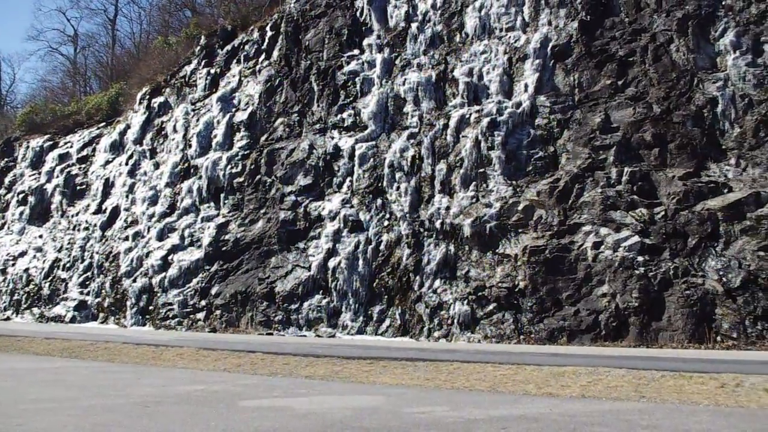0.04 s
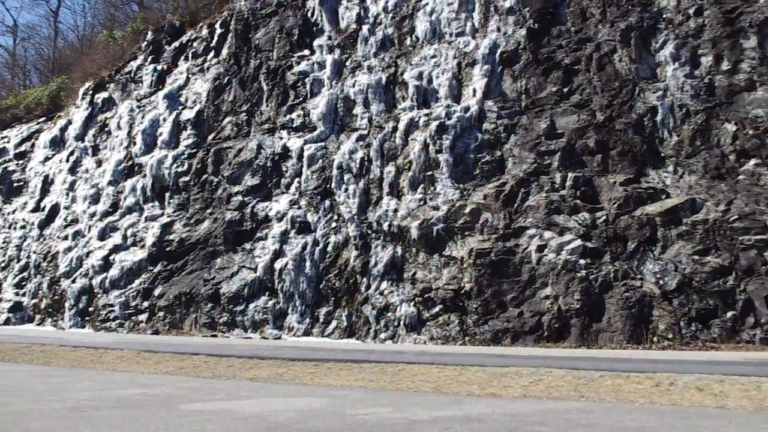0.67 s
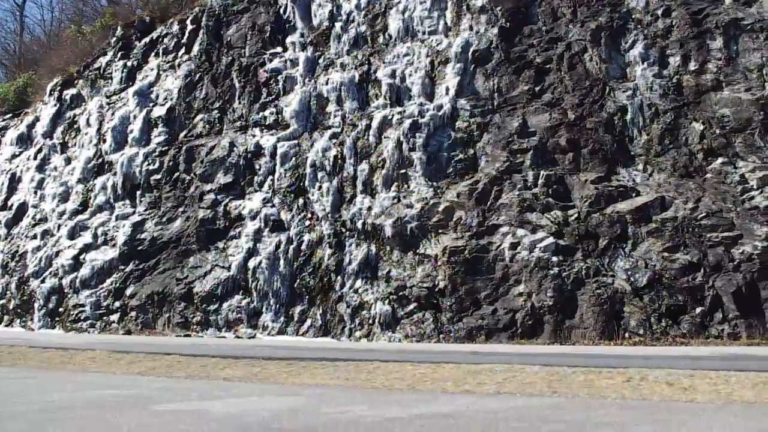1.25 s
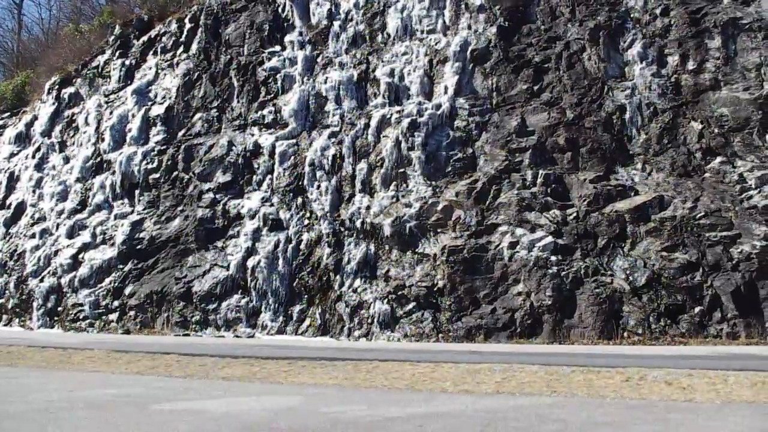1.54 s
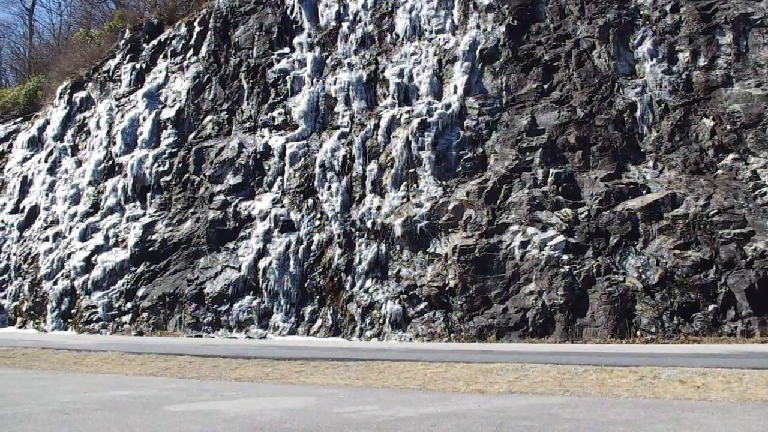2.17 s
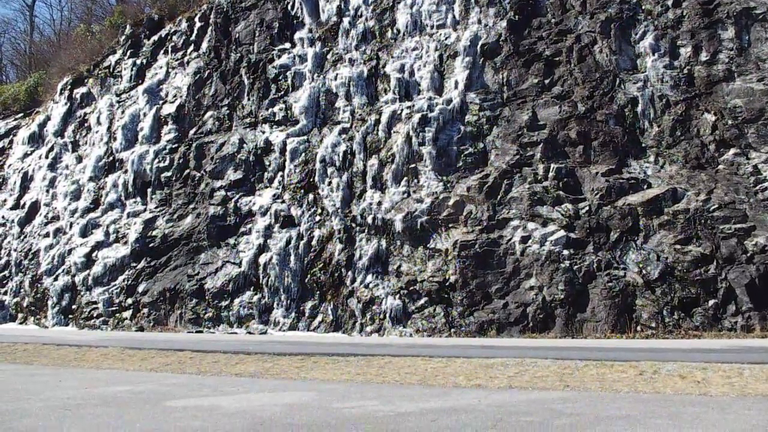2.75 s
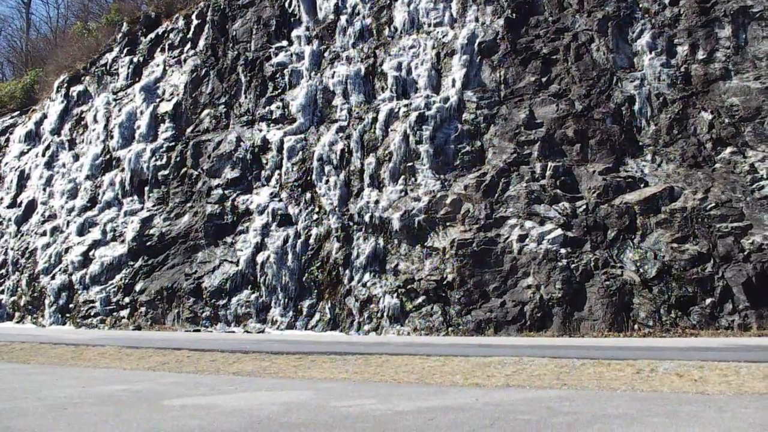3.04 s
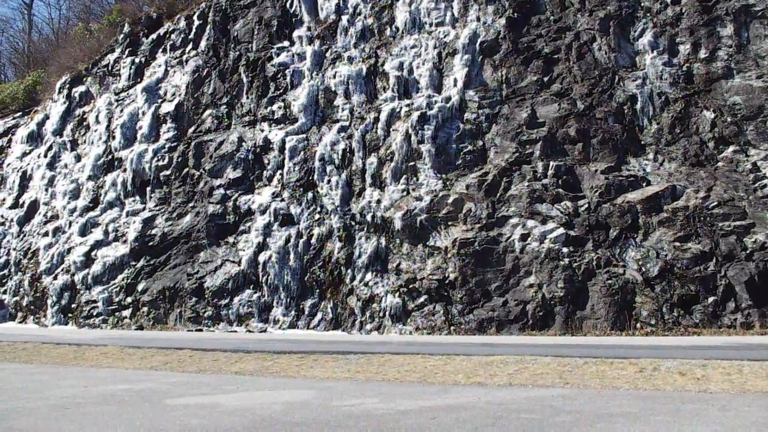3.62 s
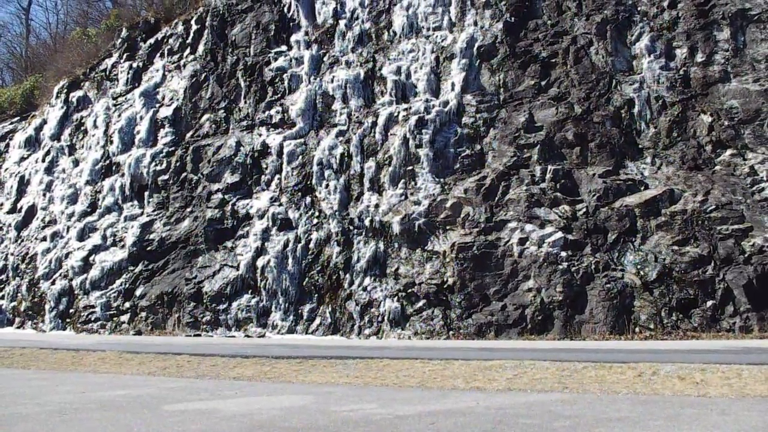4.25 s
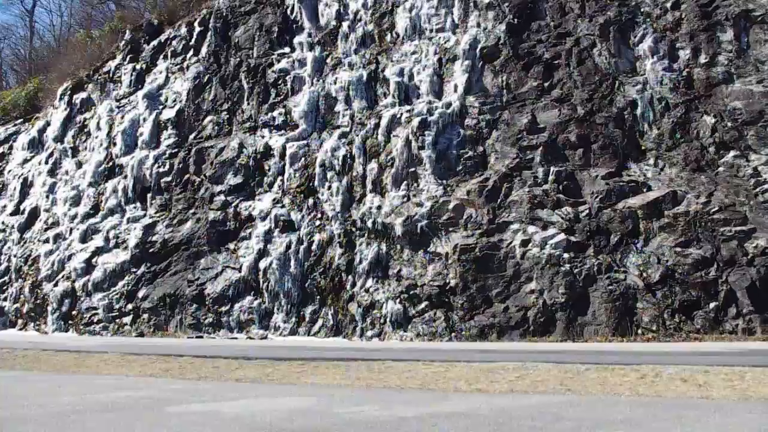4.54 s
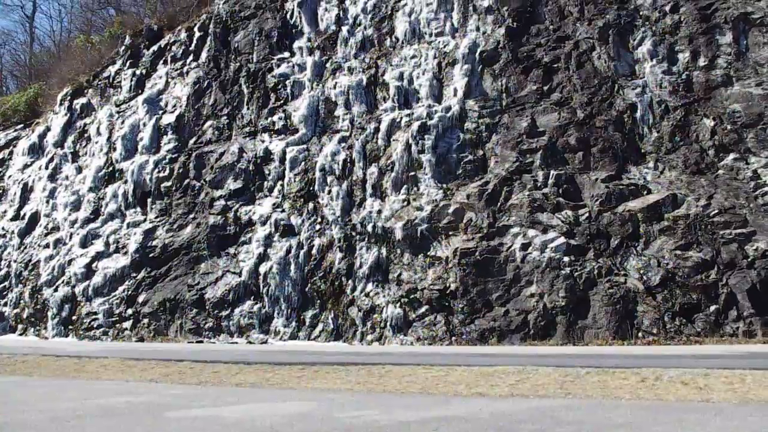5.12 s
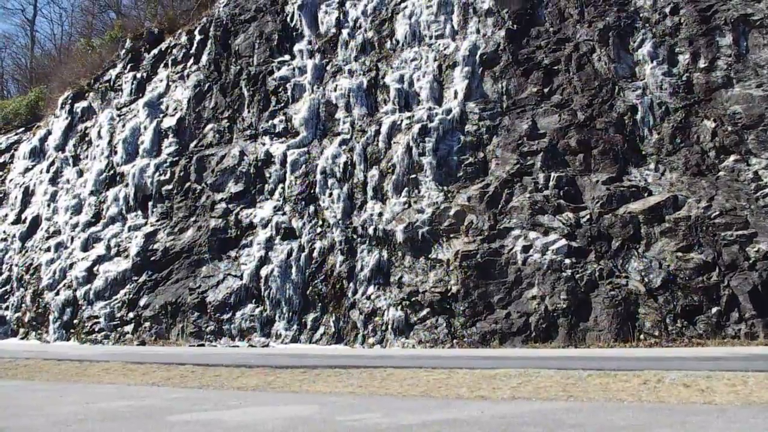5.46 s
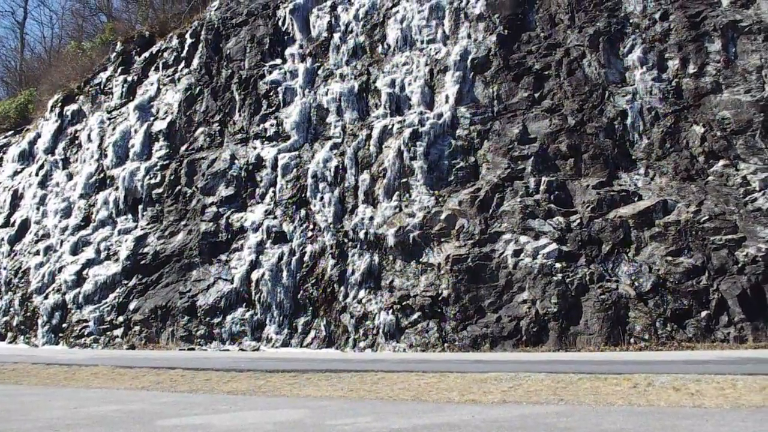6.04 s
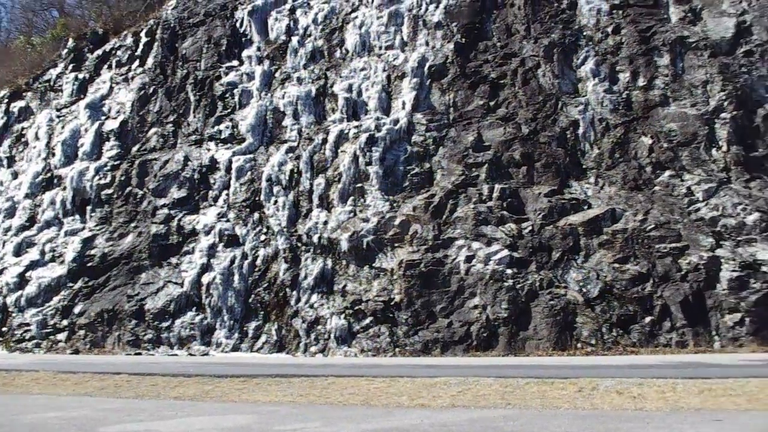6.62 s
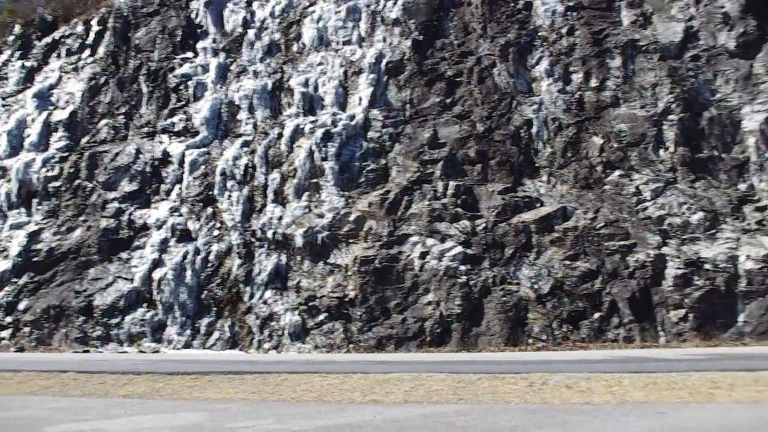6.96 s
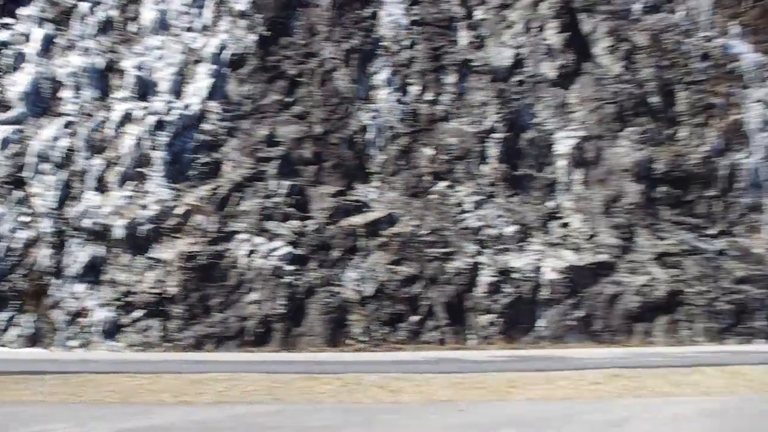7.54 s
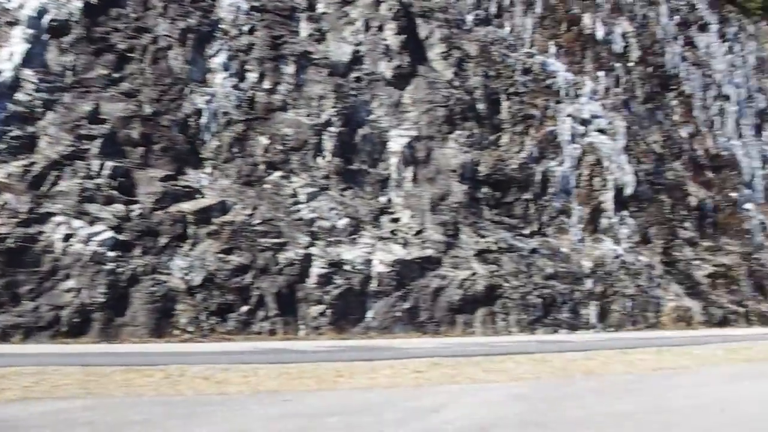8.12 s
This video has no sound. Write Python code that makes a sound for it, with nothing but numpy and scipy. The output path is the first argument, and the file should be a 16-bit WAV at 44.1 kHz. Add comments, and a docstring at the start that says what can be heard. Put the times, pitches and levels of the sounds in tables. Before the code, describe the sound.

Outdoors by an icy cliff, meltwater and crumbling ice fall in uneven flurries of sharp clicks, tiny splashes and brief crunches, over the steady hiss of trickling water. After a quieter middle stretch with scattered drips, a few hollow knocks lead into a denser, crackling shower. Low gusts of wind buffet the microphone, strongest near the end.

```python
"""Sharp ticks, splashes and crumbling ice patter down in showers, with a lull between them.
Meltwater and ice fall down a thawing roadside rock face: each piece shatters or splashes in a burst of
tiny cracks, heaps of crumbs slide, and heavy pieces knock on hollow sheets of ice. Behind them, fine
spray ticks over the hiss of trickling water and faint open air. Light wind rumbles and now and then
buffets the microphone."""
import sys
import numpy as np
from scipy import signal
from scipy.fft import rfft, irfft
from scipy.io import wavfile
from scipy.ndimage import uniform_filter1d

SR = 44100
rng = np.random.default_rng(int(sys.argv[2]) if len(sys.argv) > 2 else 0)


def store_wav(level_fs):
    """Save 16-bit WAV to argv[1]."""
    pcm = np.round(np.clip(np.atleast_2d(level_fs), -1, 1) * 32767)
    wavfile.write(sys.argv[1], SR, pcm.T.astype(np.int16))


N = 365588


def undb(db):
    """Decibels to gain."""
    return 10 ** (np.asarray(db) / 20)


def unit(x):
    """Scale to rms 1."""
    return x / np.sqrt(np.mean(x ** 2) + 1e-18)


def curve(table, column):
    """One column of a timed table, at every sample."""
    rows = np.array(table)
    return np.interp(np.arange(N) / SR, rows[:, 0], rows[:, column])


def bell(t, s, width):
    """A smooth swell of height 1 around time s."""
    return np.exp(-.5 * ((t - s) / width) ** 2)


def waver(rate_hz):
    """A random drift of rms 1: held steps, smoothed twice."""
    hold = int(SR / rate_hz)
    steps = np.repeat(rng.standard_normal(N // hold + 1), hold)
    return unit(uniform_filter1d(uniform_filter1d(steps, hold), hold)[:N])


def ring(x, gain_db, size=512):
    """Pass x through the causal filter whose dB gain is given as a function of frequency."""
    hz = np.maximum(np.arange(size // 2 + 1), .5) * SR / size
    cepstrum = irfft(np.log(undb(gain_db(hz))))[:size // 2]
    cepstrum[1:] *= 2  # minimum phase: nothing sounds ahead of the attack
    impulse = irfft(np.exp(rfft(cepstrum, size)))
    return signal.fftconvolve(x, impulse)[:len(x)]


def colour(x, points):
    """Equalise x along (Hz, dB) points."""
    hz, db = np.transpose(points)
    return ring(x, lambda f: np.interp(np.log(f), np.log(hz), db), size=4096)


def add(out, s, sound):
    """Mix a sound in at time s."""
    start = int(np.clip(s * SR, 0, N - 1))
    out[start:start + len(sound)] += sound[:N - start]


def grains(per_s, spread_db, decay_s, shared):
    """A broadband crackle of rms 1: each tiny grain sounds in its own band, and some span all bands."""
    def sparks():
        """Power of random grains that start at once and die away; mean 1."""
        draw = rng.random(N) * SR / per_s
        born, energy = draw < 1, np.zeros(N)
        size = np.minimum(-np.log(draw[born]), 5)  # most small, a few large
        energy[born] = undb(spread_db * size) ** 2
        power = signal.lfilter([1], [1, -np.exp(-1 / (decay_s * SR))], energy + 1e-9)
        return power / power.mean()
    common, out = sparks(), 0
    edges_hz = [150, 1000, 2000, 3500, 5500, 8000, 18000]
    for band in zip(edges_hz, edges_hz[1:]):
        burst = rng.standard_normal(N) * np.sqrt(shared * common + (1 - shared) * sparks())
        out = out + signal.sosfilt(signal.butter(2, band, "bandpass", fs=SR, output="sos"), burst)
    return unit(out)


def open_air(level_db=-45):
    """A faint, low bed of outdoor noise that barely moves."""
    # tone of the air: (frequency [Hz], gain [dB])
    spectrum = [(25, -23), (70, -24.5), (115, -14), (165, -2.5), (240, -0.5), (330, -1), (500, -3),
                (900, -7.5), (1500, -12), (4000, -26.5), (15000, -40)]
    return unit(colour(rng.standard_normal(N), spectrum)) * undb(level_db + .5 * waver(5.1))


def wind(calm_db=-68.5, breeze_db=-58, freshen_s=4.4):
    """A wavering rumble: gusts swell and fade over a light breeze that slowly freshens."""
    # gusts: (peak time [s], level [dB], half width [s])
    gusts = [(.21, -55, 0.043), (2.15, -47.5, 0.093), (3.11, -54, 0.042), (3.936, -54, .06),
             (4.427, -41.5, 0.089), (5.443, -45, 0.034), (5.705, -44, 0.072), (5.98, -43, 0.073),
             (6.197, -44, 0.05), (6.498, -44, 0.1), (6.683, -44.5, 0.089), (6.864, -41.5, 0.084),
             (7.414, -39, 0.064), (7.563, -33.5, 0.056), (7.923, -42, 0.12)]
    # tone of the rumble: (frequency [Hz], gain [dB])
    spectrum = [(20, -83), (40, -11), (70, -1.5), (130, 3.5), (220, 0), (400, -9), (800, -30), (3000, -36)]
    t = np.arange(N) / SR
    breeze = undb(calm_db + (breeze_db - calm_db) * np.minimum(t / freshen_s, 1) ** 2)
    gust_power = sum((undb(db) * bell(t, s, width)) ** 2 for s, db, width in gusts)
    rumble = unit(colour(rng.standard_normal(N), spectrum))
    return rumble * np.sqrt(breeze ** 2 + gust_power) * undb(3.2 * waver(35))


def buffets(usual_width_s=0.0041, lead_s=.1):
    """Single eddies bump the microphone; briefer ones sound higher."""
    # eddies: (peak time [s], level [dB], half width [s])
    eddies = [(0.211, -34.5, 0.0088), (3.998, -21, 0.00066), (4.005, -18, 0.0016), (4.456, -32.5, 0.0063),
              (4.517, -31.5, 0.0024), (5.475, -39, 0.0044), (5.625, -40, .007), (5.792, -30.5, 0.0061),
              (5.85, -30, 0.005), (5.962, -30.5, 0.0065), (6.208, -31, 0.0071), (6.259, -31.5, 0.0076),
              (6.443, -35, 0.0049), (6.469, -24.5, 0.0043), (6.483, -24.5, 0.0079), (6.533, -31.5, .003),
              (6.596, -23.5, 0.0032), (6.637, -38, 0.0035), (6.716, -37, 0.009), (6.865, -27.5, 0.0016),
              (6.903, -35.5, 0.0047), (7.212, -26, 0.0018), (7.22, -25.5, 0.0043), (7.505, -16, 0.0011),
              (7.527, -30, 0.0023), (7.54, -24, 0.0065), (7.568, -24, 0.0027), (7.578, -23.5, 0.0028),
              (7.6, -22, 0.0014), (7.612, -26.5, 0.0098), (7.627, -14, 0.00082), (7.641, -31, 0.0047),
              (7.9, -35.5, 0.0051), (7.956, -27.5, 0.0056), (8.028, -40, .007)]
    # tone of an eddy of the usual width: (frequency [Hz], gain [dB])
    spectrum = [(20, -40), (40, -18), (70, -10), (130, 2.5), (190, 5.5), (300, -0.5), (420, -7),
                (700, -21.5), (2000, -32)]
    out, t = np.zeros(N), np.arange(int(2 * lead_s * SR)) / SR
    for s, db, width in eddies:
        swell = bell(t, lead_s, width)
        pitch = (usual_width_s / width) ** 0.14
        swirl = colour(rng.standard_normal(len(t)) * swell, [(hz * pitch, g) for hz, g in spectrum])
        add(out, s - lead_s, unit(swirl) * np.sqrt(np.mean(swell ** 2)) * undb(db))
    return out


def trickle(centre_hz=5800, width_hz=5700, level_db=-50.5):
    """Thin streams hiss steadily further along the face."""
    noise = rng.standard_normal(N)
    hiss = ring(noise, lambda f: -10 * np.log10(1 + ((f - centre_hz ** 2 / f) / width_hz) ** 2))
    return unit(hiss) * undb(level_db + waver(44))


def patter(spray_db, drops_db):
    """Fine spray and heavier drops tick on rock and ice, in uneven flurries."""
    # bright tone of the spray: (frequency [Hz], gain [dB])
    spray_tone = [(1500, -18.5), (2800, -16.5), (4000, -5), (5800, -4), (7500, -1.5), (10000, -2),
                  (15000, 5.5)]
    # midrange tone of the drops: (frequency [Hz], gain [dB])
    drop_tone = [(400, -29), (800, -1), (1300, 1.5), (2300, 1), (3500, -1.5), (6000, -14), (15000, -49)]
    spray = colour(grains(per_s=1120, spread_db=3.0, decay_s=0.0007, shared=0.31), spray_tone)
    spray *= undb(2.26 * waver(70))
    drops = colour(grains(per_s=450, spread_db=3.5, decay_s=0.0015, shared=0.63), drop_tone)
    drops *= undb(2.15 * waver(40))
    return unit(spray) * undb(spray_db + 4.5) + unit(drops) * undb(drops_db + 1.5)


def splash(crackle, db, rise_s, decay_s, low_hz, tilt_db, crack=2.1, body_db=-1):
    """One landing: a crack, a burst of fragments and a short hollow ring; bigger pieces ring lower."""
    t = np.arange(int((rise_s + 6 * decay_s) * SR) + 256) / SR
    power = np.minimum(t / rise_s, 1) * np.exp(-(np.maximum(t - rise_s, 0) / decay_s) ** 0.99)
    place, *detune = rng.random(4)
    start = int(place * (N - SR))
    burst = crackle[start:start + len(t)] * np.sqrt(power)
    burst[int(rise_s * SR)] += crack
    # tilted above the lowest ring, cut steeply below it
    burst = ring(burst, lambda f: tilt_db * np.log2(np.maximum(f / low_hz, 1))
                 - 10 * np.log10(1 + (low_hz / f) ** 8))
    # the lowest resonances outlast the crack by a few cycles; dull, heavy blows feed them most
    modes_hz = low_hz * (np.array([1.01, 1.45, 2.1]) + .2 * (np.array(detune) - .5))
    body = sum(signal.lfilter(*signal.iirpeak(hz, Q=16, fs=SR), burst) for hz in modes_hz)
    return unit(burst + undb(body_db) * body) * np.sqrt(power.mean()) * undb(db)


def small_landings(crackle, shower_db, over_db=6, spread_db=2.5, count=220):
    """Lesser pieces land at random, as strongly as the shower runs; most are small and bright."""
    out = np.zeros(N)
    for when, size, length, pitch in rng.random((count, 4)):
        db = shower_db[int(when * N)] + over_db + spread_db * min(-np.log(size), 2)
        tick = splash(crackle, db, rise_s=0.00027, decay_s=0.0016 * (0.5 + length),
                      low_hz=900 * 5 ** np.sqrt(pitch), tilt_db=-1)
        add(out, when * N / SR, tick)
    return out


def knocks(attack_s=0.00025, detune_span=0.069):
    """Heavy pieces knock on hollow sheets of ice, which ring briefly; no two are tuned quite alike."""
    # blows: (time [s], base level [dB], main ring [Hz], decay of the main ring [s])
    blows = [(.014, -32, 790, 0.0091), (.149, -19, 1390, 0.0029), (1.717, -22, 1930, 0.0024),
             (2.104, -16.5, 1200, 0.0024), (4.572, -26.5, 905, 0.0036), (5.185, -31, 1346, 0.013),
             (5.313, -26.5, 608, 0.015), (5.324, -24, 932, 0.0099), (6.073, -29, 1130, 0.0075),
             (6.328, -23, 1160, 0.0044)]
    # modes of a sheet: (frequency [multiple of the main ring], gain [dB])
    modes = [(.8, -10.5), (1, 2), (1.22, -17), (1.55, -13), (2.75, 0.5)]
    out, t = np.zeros(N), np.arange(SR // 10) / SR
    attack = np.minimum(t / attack_s, 1)
    for s, db, main_hz, decay_s in blows:
        for (multiple, mode_db), detune, phase in zip(modes, *rng.random((2, len(modes)))):
            hz = main_hz * multiple * (1 + detune_span * (detune - .5))
            fade = np.exp(-t / decay_s * multiple ** 1.1)  # higher modes die sooner
            add(out, s, undb(db + mode_db) * np.sin(2 * np.pi * (hz * t + phase)) * attack * fade)
    return out


def slides(crackle):
    """Heaps of crumbs slide in a crunch that swells, then settles."""
    # heaps: (peak time [s], level [dB], decay [s], lowest ring [Hz])
    heaps = [(0.578, -26.5, .017, 1320), (.94, -37.5, 0.014, 1720), (1.898, -27.5, 0.0036, 3470),
             (3.666, -30, 0.0065, 3870), (4.62, -36, .005, 4000), (5.085, -24.5, 0.0049, 1380),
             (6.3221, -21.5, 0.008, 820), (6.65, -27, 0.0082, 3720), (6.809, -27.5, .006, 4540),
             (7.101, -26.5, 0.004, 5030), (8.116, -33.5, 0.01, 1350), (8.243, -33, 0.007, 3380)]
    out = np.zeros(N)
    for s, db, decay_s, low_hz in heaps:
        rise_s = 1.5 * decay_s
        add(out, s - rise_s, splash(crackle, db, rise_s, decay_s, low_hz, tilt_db=-3.5))
    return out


def near_landings(crackle):
    """The nearest drops and pieces of ice strike sharply."""
    # impacts: (time [s], level [dB], decay [s], lowest ring [Hz], treble tilt [dB/octave])
    hits = [(0.083, -17.5, 0.003, 3460, 10.5), (.107, -30, .0013, 3100, -21), (.114, -29, .0012, 2500, 2),
            (.147, -18.5, 0.0042, 1220, -1), (0.237, -19, 0.0014, 1700, 8), (0.27, -26.5, 0.003, 1660, -3),
            (0.312, -14, 0.0018, 2830, 16), (.356, -20, 0.00071, 2600, 6), (.436, -29, 0.0047, 1380, -7),
            (0.493, -27, 0.0024, 2360, -8), (0.509, -28.5, 0.0063, 1130, -6), (0.576, -22, .0005, 1800, -2),
            (.583, -28, 0.0017, 1600, -6), (0.675, -29, 0.0034, 2200, -4), (0.696, -20.5, 0.0016, 1900, 3),
            (0.726, -19, 0.00092, 5200, 5), (.759, -30, 0.0027, 2400, -6), (.79, -29, 0.0055, 1490, -2.5),
            (0.869, -25, 0.0019, 2880, -7), (0.906, -21, 0.0018, 2190, -8),
            (0.9107, -18.5, 0.0009, 1500, -5), (1.117, -28, 0.0055, 1400, -1.5),
            (1.175, -24.5, 0.0018, 5060, 2.5), (1.312, -30, 0.0022, 3520, -11),
            (1.493, -29, 0.0028, 1700, -4), (1.603, -28.5, 0.0018, 1500, 5), (1.414, -29, 0.0062, 990, -6),
            (1.652, -21.5, 0.0017, 1640, -8), (1.685, -21, 0.0015, 1570, -3.5),
            (1.714, -17, 0.0024, 1550, -5.5), (1.717, -18.5, 0.0016, 1690, -7.5),
            (1.748, -29, 0.0046, 940, 2.5), (1.809, -28, 0.0038, 890, -3), (1.825, -24.5, 0.0026, 1510, -4),
            (1.834, -24.5, 0.0038, 1140, -3.5), (1.928, -29, 0.0047, 614, -3.5),
            (1.98, -28, 0.0021, 1300, 0), (2.055, -25.5, 0.0015, 594, -1.5), (2.1039, -23, 0.002, 1050, -7),
            (2.125, -32, 0.0021, 1090, -10), (2.223, -29, 0.0014, 2390, -8), (2.239, -33, 0.0021, 1310, -5),
            (2.294, -31, 0.0023, 1110, -4.5), (2.367, -30, 0.001, 1600, -2),
            (2.401, -22.5, 0.0011, 5050, 2), (2.592, -31, 0.0011, 1490, -5), (2.636, -33, 0.0012, 3000, -4),
            (2.72, -35, 0.0025, 1300, -8), (2.797, -33.5, 0.0019, 1200, -7),
            (2.88, -38.5, 0.0039, 1440, -10), (3.16, -29.5, 0.0013, 2920, -29),
            (3.367, -32, 0.00082, 3500, 3), (3.552, -27, 0.0018, 4360, -4), (3.558, -28, .001, 4800, -5),
            (3.573, -29, 0.002, 3000, -5), (3.578, -30, 0.0034, 1230, -3.5), (3.5905, -29, 0.002, 2300, -5),
            (3.595, -31, .0013, 3600, -7), (3.6055, -25.5, 0.0016, 3800, -6),
            (3.613, -26.5, .0025, 1400, -2), (3.6206, -28, 0.0012, 4500, -2), (3.627, -29, .0018, 5200, -8),
            (3.637, -25, 0.0022, 2320, -0.5), (3.6425, -28, 0.0019, 4200, -5),
            (3.774, -33.5, 0.0058, 980, -2), (3.826, -33, 0.003, 2500, 0.5), (4.073, -34, 0.0019, 4500, -6),
            (4.098, -30, 0.0034, 4200, 1), (4.452, -20, 0.0028, 2940, 9.5), (4.465, -35, 0.0043, 1490, -12),
            (4.57, -30.5, 0.0033, 800, -2), (4.657, -26, 0.0076, 1780, -1), (4.693, -26, 0.006, 2500, -1),
            (4.766, -26.5, 0.0044, 4770, -14), (4.776, -15.5, 0.00054, 2880, 0),
            (4.7805, -23.5, 0.0011, 3280, -8), (5.07, -29.5, .002, 4750, -10),
            (5.096, -19.5, 0.0042, 905, -1), (5.168, -21.5, 0.0019, 990, 0),
            (5.183, -19.5, 0.0035, 1420, -10), (5.208, -19, 0.0047, 920, -5), (5.248, -18, 0.0036, 680, 1),
            (5.262, -31, 0.0054, 1450, -10), (5.3114, -12, 0.00047, 2400, -0.5),
            (5.313, -18.5, 0.0048, 1240, -5), (5.3239, -21, 0.0023, 864, -2),
            (5.414, -33.5, 0.0073, 790, -1.5), (5.831, -25.5, 0.0039, 880, -3), (5.95, -23, 0.003, 4400, 0),
            (5.9568, -10.5, 0.00062, 4100, 3), (5.971, -22, 0.0028, 1030, -4),
            (6.012, -31.5, 0.0039, 1500, -13), (6.071, -20, 0.0033, 870, -5.5),
            (6.073, -16, 0.0016, 1800, -11.5), (6.092, -27, 0.005, 1190, -9),
            (6.194, -19.5, 0.0012, 715, -3.5), (6.237, -25, 0.002, 1190, -2.5),
            (6.246, -14, 0.0079, 1210, 9.5), (6.321, -18, 0.0025, 1200, -2), (6.354, -20, 0.0022, 540, 2),
            (6.397, -27.5, 0.0013, 855, -4), (6.417, -27, 0.0033, 1770, -2), (6.499, -24, .003, 3500, 6),
            (6.553, -27, .0018, 3000, 2), (6.601, -28.5, 0.0034, 3400, -13), (6.609, -22, .001, 3500, 9),
            (6.617, -20, 0.0011, 3500, 5), (6.628, -19, 0.00065, 2940, -3),
            (6.6309, -15, 0.0007, 2200, 0.5), (6.668, -13.5, 0.002, 3550, 12),
            (6.678, -16.5, 0.0028, 5230, 10), (6.724, -26, .004, 4000, 3), (6.7543, -16, 0.0012, 3720, 1),
            (6.819, -19.5, 0.0017, 1560, 0), (6.8745, -16.5, 0.0015, 3430, 2),
            (6.916, -23.5, 0.0021, 3330, 5), (6.9627, -14.5, 0.0049, 1640, 5.5),
            (6.967, -14, .0009, 1290, 2.5), (7.0, -23, .003, 4500, 5), (7.027, -22.5, 0.0028, 3400, 1.5),
            (7.037, -17.5, 0.0011, 3520, 1), (7.126, -25, 0.0023, 3800, 2), (7.159, -22, 0.0012, 3500, 7),
            (7.19, -22, .0025, 4200, 1), (7.1985, -17, 0.00063, 4070, -2), (7.227, -11.5, 0.0013, 1090, 5),
            (7.279, -23, .002, 4500, 6), (7.334, -29, 0.0008, 3000, 0), (7.452, -27, .001, 3500, 1),
            (7.496, -14, 0.00049, 1900, 0), (7.509, -21, 0.0038, 3570, -11), (7.525, -31, 0.015, 3400, -9),
            (7.573, -25.5, 0.006, 536, 2), (7.622, -43, 0.0045, 900, 2), (7.663, -35, 0.0023, 4500, -2),
            (7.674, -37, 0.0017, 4500, -3), (7.76, -31, 0.0011, 1600, -16),
            (7.813, -24, 0.0011, 1700, -3.5), (7.846, -27, 0.0019, 1990, 4),
            (7.912, -28.5, 0.0073, 1140, -1.5), (8.176, -23, 0.0012, 2520, 5)]
    out = np.zeros(N)
    for s, db, decay_s, low_hz, tilt_db in hits:
        rise_s = 0.23 * decay_s  # bigger splashes build more slowly
        add(out, s, splash(crackle, db, rise_s, decay_s, low_hz, tilt_db))
    return out


def rock_scatter(x, wet_db=-20, t60_s=.3, build_s=0.0017):
    """The rough face and the road throw back a short, diffuse tail."""
    t = np.arange(SR // 2) / SR
    tail = rng.standard_normal(len(t)) * np.exp(-np.log(1000) * t / t60_s) * np.minimum(t / build_s, 1)
    return x + undb(wet_db) * signal.fftconvolve(x, tail / np.linalg.norm(tail))[:N]


def dip(start_s=7.631, fall_s=.002, hold_s=0.024, recovery_s=0.014, depth_db=-9):
    """A gain curve: the level drops abruptly after the strongest gust, holds and eases back."""
    since = np.arange(N) / SR - start_s
    fall = np.clip(since / fall_s, 0, 1)
    release = np.clip(1 - (since - hold_s) / recovery_s, 0, 1)
    return undb(depth_db * fall * release)


def scene():
    """Falling ice and water over the trickle and the open air; all but the wind dips once."""
    # strength of the shower: (time [s], fine spray [relative dB], heavier drops [relative dB])
    shower = [(0.0, -41.5, -44), (0.3, -39.5, -43.5), (0.71, -37.5, -42.5), (1.04, -37, -46),
              (1.57, -42, -50), (1.89, -41.5, -45.5), (2.56, -46, -50.5), (4.48, -47.5, -55.5),
              (4.59, -43.5, -49), (5.08, -46.5, -56), (5.24, -46, -44), (5.52, -45, -55),
              (5.89, -45.5, -53.5), (6.26, -41, -44), (6.68, -35.5, -45.5), (6.77, -40, -50),
              (6.94, -38, -47.5), (7.11, -33, -48.5), (7.36, -35, -50), (7.49, -38, -49.5),
              (7.66, -41.5, -51), (8.1, -39, -50.5), (8.29, -38, -46)]
    spray_db, drops_db = curve(shower, 1), curve(shower, 2)
    crackle = grains(per_s=2600, spread_db=1.0, decay_s=0.000083, shared=0.1)
    falling = near_landings(crackle) + slides(crackle) + knocks()
    falling += small_landings(crackle, (spray_db + drops_db) / 2) + patter(spray_db, drops_db)
    roadside = open_air() + rock_scatter(falling) + trickle()
    return (roadside * dip() + wind() + buffets())[None]


def record(dry, top_hz=15700):
    """A small microphone that dulls the highest treble, then a steep cut."""
    # microphone response: (frequency [Hz], gain [dB])
    response = [(100, 0), (2000, -2.5), (2900, -1.5), (4300, 2), (5600, 4.5), (7200, 1), (10000, 0),
                (11000, -8), (12000, -17), (14000, -29.5), (15000, -45), (16000, -50)]
    high_cut = signal.ellip(8, .2, 70, top_hz, fs=SR, output="sos")
    return signal.sosfilt(high_cut, colour(dry[0], response))[None]


dry = scene()
out = record(dry)
store_wav(out)
```